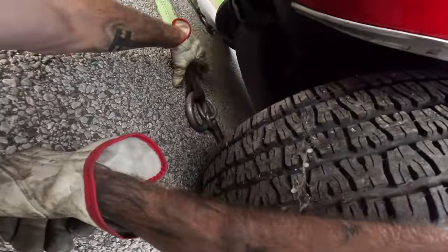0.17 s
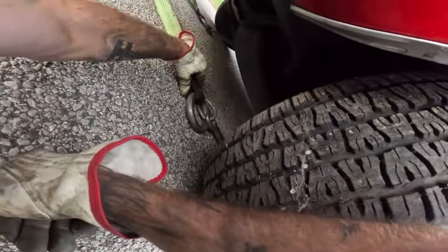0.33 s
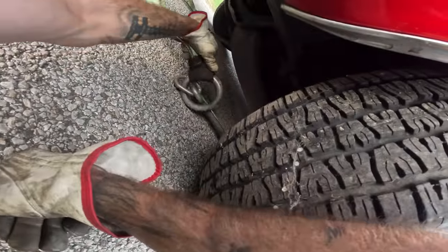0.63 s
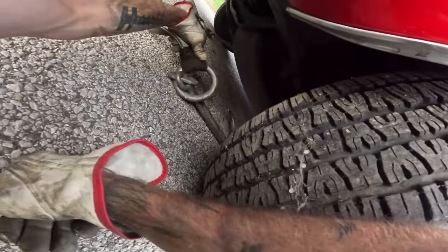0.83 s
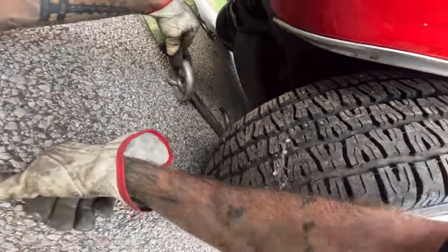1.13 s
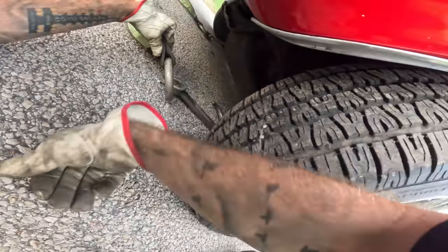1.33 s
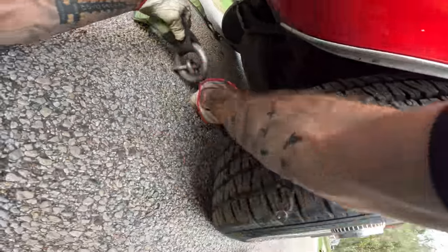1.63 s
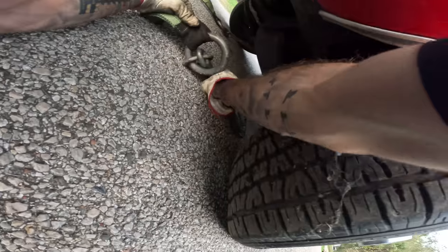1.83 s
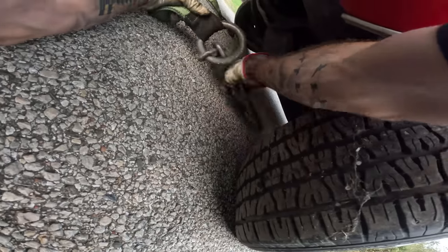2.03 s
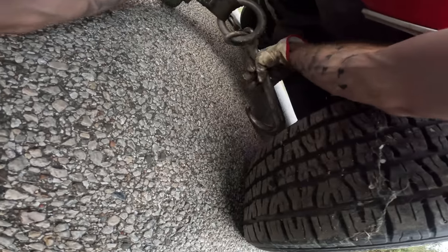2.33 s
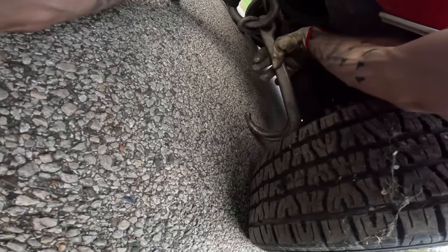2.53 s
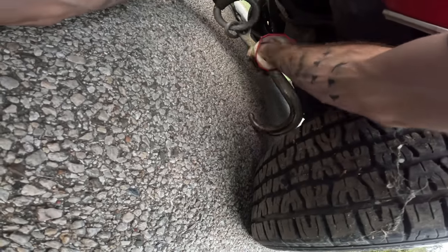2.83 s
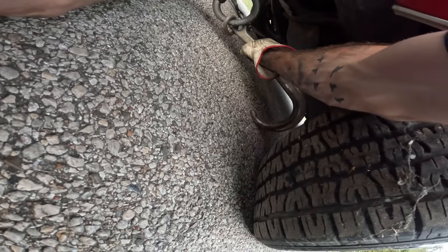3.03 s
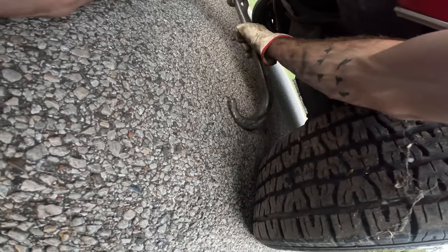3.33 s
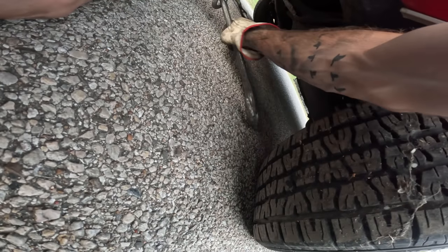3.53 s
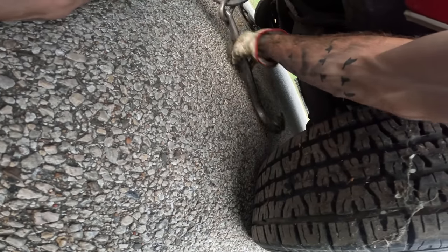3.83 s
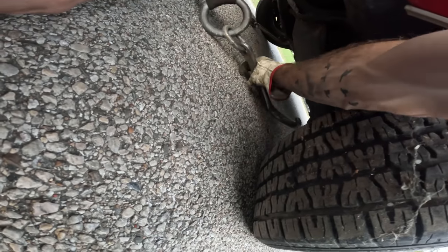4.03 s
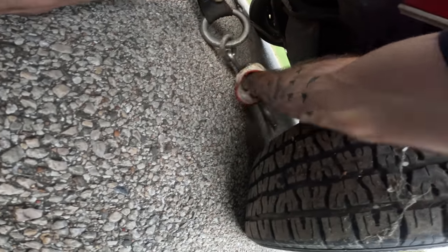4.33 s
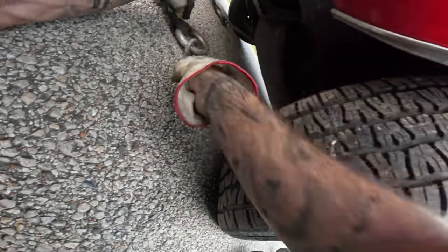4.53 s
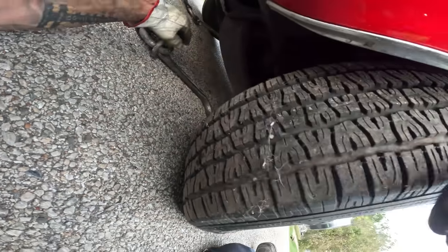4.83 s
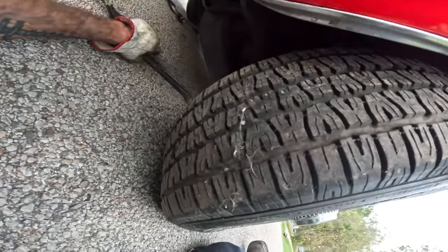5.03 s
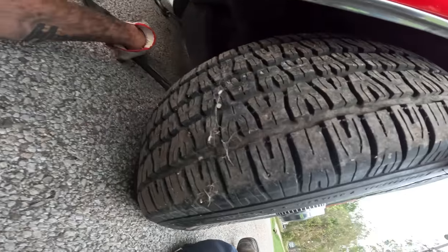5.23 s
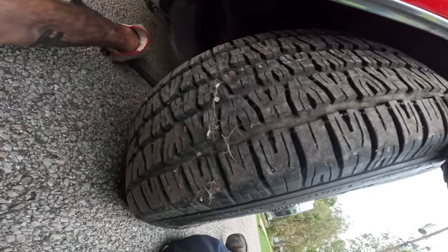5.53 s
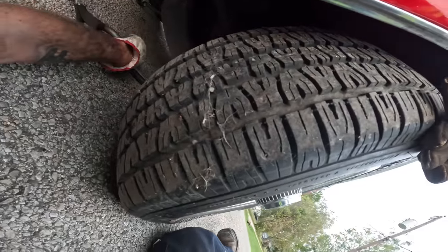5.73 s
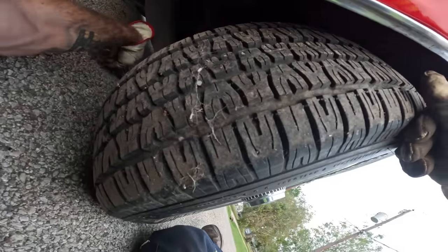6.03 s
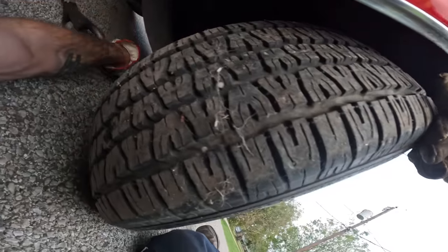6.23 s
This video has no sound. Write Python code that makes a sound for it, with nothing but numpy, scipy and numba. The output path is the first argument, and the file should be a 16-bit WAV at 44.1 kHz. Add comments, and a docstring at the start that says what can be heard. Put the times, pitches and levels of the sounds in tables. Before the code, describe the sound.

A steel tow chain and hook clink, rattle and scrape over gritty asphalt under a car, while a truck engine idles nearby.

```python
"""On gravelly asphalt beside a car, one close microphone; a truck engine idles nearby throughout.
From 0.3 s a steel tow chain is dragged in: blows and scraping ring its links, ring and hook, grit
crunches, and a hand or the ground chokes the ringing. Around 3 s the hook bears firmly on the car's
underside and knocks thump the chassis. The chain rattles on, goes quiet near 5 s and ends in a
last clatter just after 6 s."""
import sys
import numpy as np
from scipy import signal
from scipy.fft import rfft, irfft
from scipy.io import wavfile
from scipy.ndimage import uniform_filter1d, minimum_filter1d
from numba import njit

SR = 44100
rng = np.random.default_rng(int(sys.argv[2]) if len(sys.argv) > 2 else 0)


def pcm_store(signal):
    """Save signal as 16-bit PCM."""
    levels = np.round(np.clip(np.atleast_2d(signal), -1, 1) * 32767)
    wavfile.write(sys.argv[1], SR, levels.astype(np.int16).T)


N = 281358

# the idle's firing rate, and the level of the whole background, which dips while the chain is loud:
# time_s, firing_hz, background_db
BACKGROUND = [(0, 28.9, -34.5), (.1, 28.25, -35.5), (.43, 28.83, -35.5), (.91, 28.84, -37),
              (1.1, 28.69, -42.5), (1.87, 28.5, -39.5), (2.45, 28.93, -37), (3.13, 28.33, -40),
              (3.73, 28.45, -37.5), (4.42, 28.48, -38.5), (4.78, 28.77, -41), (4.9, 29.1, -40),
              (5.2, 28.8, -39), (5.67, 28.91, -36), (6.15, 28.74, -34), (6.38, 29.1, -33.5)]
# exhaust harmonics: firing_multiple, level_db
EXHAUST_ORDERS = [(1, -21), (2, 2), (3, -7.5), (4, 1), (5, -5), (6, -18.5), (7, -6.5), (8, -5.5), (9, -7),
                  (10, -42), (11, -18), (12, -28.5), (13, -14.5), (14, -22), (15, -25.5), (16, -53),
                  (17, -39.5), (18, -16), (19, -26.5), (20, -33.5), (21, -36), (22, -32)]
# street and engine noise: frequency_hz, density_db
STREET_SPECTRUM = [(15, -36), (25, 7), (54, -2.5), (219, 1), (301, -15), (373, -16.5), (450, -7.5),
                   (543, -7.5), (1060, -22.5), (2020, -24), (3540, -28), (12400, -53), (15000, -91.5)]

# steel striking steel: start_s, links_db, then relative to the links hook_db, ring_db, overtones_db,
# shackle_db, then the pitches driven hardest, link_hz, hook_hz
CLINKS = [(0.271, -32, 2.5, -27, -37, -35, 3710, 2140), (0.29, -24.5, -10, -20, -35, -32, 3950, 2080),
          (0.3137, -35, -18, -25, -18, -32, 3700, 2580), (.442, -15.5, -4, -17, -13, -34, 4120, 2580),
          (0.4581, -6.5, -26, -36, -16, -40, 3840, 2390), (.519, -21, -8, -29, -21, -28, 4150, 2350),
          (0.5337, -17, -12, -19, -7, -16, 4030, 2300), (0.5536, -24, -3, -12, -18, -29, 4270, 2420),
          (0.5782, -4.5, -21, -27, -16, -26, 3790, 2400), (0.609, -12.5, -2, -32, -30, -35, 4280, 1370),
          (0.625, -7, -7, -20, -24, -17, 3850, 2390), (0.645, -2.5, -12, -11.5, -16, -14.5, 4680, 2390),
          (.7763, -17, -2, -23, -26, -34, 3840, 2470), (0.7969, -15, -12, -17, -25, -27, 4490, 1470),
          (.823, -3.5, -32, -10, -16, -15, 3855, 2440), (0.8693, 0, -8, -14, -6.5, -14, 3827, 2800),
          (1.0156, -8, -5, -6, -15, -43, 3830, 2800), (1.218, -9.5, -14.5, -10, -15, -23, 3920, 2770),
          (1.2434, -12, -6.5, -10, -24, -23, 3840, 2800), (1.3087, -15.5, -11.5, -30, -11, -35, 3840, 2790),
          (1.513, -15, -14, -7, -7, -29, 3840, 2380), (1.5523, -33, 1, -12, -14, -22, 3900, 2580),
          (1.5892, -10.5, -13, -18, -22, -31, 3880, 2220), (1.6342, -18, -13, -6, -24, -31, 3730, 2830),
          (1.6412, -4.5, -11, -29, -22, -11, 4370, 2800), (1.72, -22, -6, -31, -37, -30, 3840, 2360),
          (1.7458, -12.5, -21, -32, -27, -40, 4560, 2820), (1.7778, -3.5, -22, -23, -30, -33, 3840, 2920),
          (1.8616, -15.5, -15, -29, -37, -41, 4560, 2800), (1.959, -30, -18, -15, -24, -33, 4140, 2420),
          (1.975, -18, -11, -18, -28, -33, 3760, 1370), (2.0072, -27, 1, -34, -31, -39, 3830, 2500),
          (2.0647, -28.5, 8, -28, -14, -33, 4530, 2200), (2.1177, -24, 2, -9, -26, -21, 4500, 2380),
          (2.138, 0, -30, -16, -27, -23.5, 3760, 2560), (2.1968, -8, -6, -14.5, -17, -18, 3620, 2500),
          (2.2297, -8, -8, -13, -10, -27, 4300, 2470), (2.25, -12.5, -6, -31, -33, -35, 4560, 2500),
          (2.3873, -13.5, -1, -16, -17, -31, 4050, 1470), (2.4218, 0.5, -16, -21, -14, -21.5, 3770, 2760),
          (2.4707, 0, -9, -24, -15, -28, 4000, 2080), (2.5142, -2, -24, -12, -3, -16.5, 3860, 1890),
          (2.5581, 1.5, -13, -24, -21, -21, 3880, 2070), (2.675, -10, 5, -40, -40, -44, 3700, 2366),
          (2.965, -35, -6, -24, -31, -42, 4035, 2230), (2.9801, -25, 2.5, -26, -32, -41, 3870, 2610),
          (3.0725, -18, 9.5, -15, -27, -35, 3706, 1340), (3.1381, -3, -13, -14.5, -3.5, -14, 4056, 2210),
          (3.2568, -3.4, -12, -16, -13, -29, 3840, 2440), (3.3002, -20, -2, -22, -20, -33, 3920, 1510),
          (3.32, -14.5, -17, -23, -3, -33, 3850, 2760), (3.3267, -7.5, -27, -14, -12, -31, 4150, 2350),
          (3.4325, -32, 8, -22, -43, -37, 4220, 2920), (3.5722, -21.5, 3, -13, -15, -27, 3790, 2440),
          (3.6241, -20, 4, -16, -21, -30, 3900, 2420), (3.6379, -4.5, -6.5, -8.5, -9.5, -25, 3700, 2440),
          (3.7773, -30, -3, -12, -19, -21, 4550, 2400), (3.7949, 1, -11.5, -16.5, -10, -22, 3700, 2290),
          (3.854, -16, -12, -10, 1.5, -31, 4147, 2430), (3.9506, -5.5, -32, -27, -8, -25, 3880, 2400),
          (4.003, -27.5, -4, -5, -28, -28, 4750, 2400), (4.056, -27, -2, -27, -25, -20.5, 4280, 1370),
          (4.0947, -9, -12, -24, -36, -37, 4560, 2440), (4.147, -12, -1.5, -22, -25, -20, 4450, 2490),
          (4.1853, -10, -20, -16, -14, -32, 4340, 2480), (4.228, -22, -7, -27, -21, -28, 4000, 2410),
          (4.2425, -14, 3, -30, -6, -22, 3825, 2490), (4.3886, -33, -8, -28, -17, -17, 3580, 2080),
          (4.4583, -0.5, -19.5, -15, -13.5, -25, 3835, 1510), (4.6137, -15, -28, -26, -25, -21, 4080, 2430),
          (4.7563, -29, -20, -30, -19, -28, 4100, 2435), (4.774, -7.5, -15.5, -29, -17, -26, 3830, 2360),
          (4.9986, -38, 4, -21, -4, -8, 3780, 2340), (5.089, -26.5, -16, -22, -30, -38, 3800, 1420),
          (5.118, -18.5, -10, -27, -36, -40, 3820, 2740), (5.448, -6, -29, -26, -18, -26.5, 3900, 2442),
          (5.4983, -15, -3, -27, -27, -29, 4630, 2820), (5.5278, -9, -11, -39, -30, -28, 4200, 2800),
          (5.6032, -14.5, -8, -18, -34, -31, 3800, 2524), (5.682, -12.5, -22, -25, -34, -31, 3700, 2580),
          (5.7027, -7.5, -7, -12, -27, -30, 4000, 2580), (5.7512, -13, -10, -31, -34, -41, 3990, 2440),
          (5.9165, -36, -1, -21, -31, -32, 4116, 2440), (5.9594, -14, -2.5, -22, -18, -27, 4370, 2130),
          (6.0069, -36, 5, -25, -25, -27, 4246, 2400), (6.0452, -10.5, -6, -17, -35, -24.5, 4150, 2480),
          (6.0815, -14, -5, -26, -15, -30, 4150, 2450), (6.121, -8, 5.5, -30, -8, -19, 4180, 1380),
          (6.134, -6.5, -21, -8, -3.5, -13, 4150, 2790), (6.1709, -8.5, -17, -18, -22, -24, 4120, 2700),
          (6.2883, -33.5, -2, -28, -30, -23, 3820, 2427)]
# steel rubbing steel: start_s, hold_s, links_db, then relative to the links hook_db, ring_db,
# overtones_db, shackle_db, then grip (0 free, 1 held)
SCRAPES = [(0.459, 0.013, -17, -18, -14, -28, -26, 0.46), (.55, 0.095, -32, 6, -22, -19, -23, 0.69),
           (.65, 0.033, -17, -0.5, -9, -22, -31, 0.47), (.69, 0.021, -22.5, 3, -13, -25, -21.5, 0.33),
           (0.792, 0.11, -20.5, -5.5, -9, -8.5, -15, 0.78), (.87, 0.058, -21.5, -16, -15, -1.5, -10, 0.16),
           (.94, .06, -32, -12, -9, 2.5, -7, 0.18), (1.02, 0.083, -19, -12.5, -1.5, -14, -17.5, 0.15),
           (1.13, 0.026, -14.5, -8, -5, -14, -16, 0.32), (1.221, 0.11, -35, -21, -1, -19, -14, 0.43),
           (1.53, 0.11, -34.5, -7, -8, -19, -19, 0.75), (1.638, 0.027, -12.5, -18, -7.5, -16, -27, 0.41),
           (1.73, 0.063, -27.5, -4, -6.5, -24, -20, .35), (1.865, 0.011, -38, -8, -22, -26, -24, 0.48),
           (1.9, 0.32, -51.5, 7, -14, -15, -12, 0.63), (2.139, 0.021, -13, -2.5, -21, -20, -33, 0.44),
           (2.19, 0.048, -23.5, 1, -2, -18, -12, 0.75), (2.42, 0.08, -19.5, -19, -15, -25, -25, 0.61),
           (2.515, .01, -25, -9, -28, 2, -14, 0.96), (2.56, 0.013, -20, -7, -4, -10, -20, 0.61),
           (2.676, 0.0091, -30.5, 22.5, -16.5, -32, -34, .7), (2.97, 0.011, -37, 3, -21, -27, -32, 0.67),
           (3.133, 0.016, -20, 10.5, -8.5, -5, -10, 0.59), (3.3, 0.057, -23.5, 3.5, -19, -10, -18, 0.56),
           (3.58, .05, -41, 3, -12, 0, -11, 0.28), (3.651, 0.053, -20.5, -4, -11, -2.5, -15.5, 0.15),
           (3.7, 0.034, -16.5, -12.5, -15, -13, -12, 0.27), (3.795, 0.016, -23.5, 0.5, -15, -1, -8, 0.34),
           (3.861, 0.071, -17.5, -3.5, -15.5, -7.5, -22.5, 0.58),
           (4.1, 0.039, -31.5, -14, -1, -9, -19, 0.26), (4.201, 0.083, -27, 6, -13.5, -10.5, -19, 0.71),
           (4.459, 0.04, -15, -14, -14, -19, -8.5, 0.21), (4.511, 0.031, -22, -24.5, 3, -13, -20.5, 0.18),
           (4.6, 0.02, -29.5, -10, -14.5, -20, -21, 0.32),
           (4.771, 0.025, -20, -13.5, -15.5, -14, -18, 0.18),
           (4.82, 0.035, -27.5, -18, -14, -30, -27, 0.53), (5.446, 0.013, -24.5, -13, -22, -18, -24, 0.49),
           (5.518, 0.063, -20.5, -6.5, -33, -25, -30, 0.51), (5.679, 0.041, -25.5, 0, -22, -15, -18, 0.58),
           (6.0, 0.1, -39.5, 5, -6, -20, -13, 0.58), (6.14, 0.04, -19.5, -2, -19, -9.5, -16, 0.49)]
# a hand or the ground stops the swinging chain: start_s, hold_s, added_grip
CHOKES = [(0.499, 0.02, 0.5), (0.833, 0.014, 0.1), (1.18, .025, 0.16), (1.349, .03, 0.05),
          (1.677, .03, 0.27), (1.847, .02, 0), (2.26, 0.088, .3), (2.404, .015, 0), (2.447, 0.018, 0.4),
          (2.488, .02, 0), (2.535, 0.018, 0.14), (2.608, .05, 0.1), (2.701, .1, 0.2), (3.203, .04, .3),
          (3.377, .1, 0.41), (3.731, 0.054, 0.28), (3.833, .02, 0.06), (3.958, 0.054, 0.25),
          (4.148, 0.021, 0.34), (4.305, 0.085, 0.55), (4.483, 0.01, 0.2), (4.553, 0.02, 0.2),
          (4.68, 0.053, 0.16), (4.815, .02, 0.28), (4.89, .08, 0.4), (4.99, 0.17, .3), (5.463, 0.026, 0.08),
          (5.596, 0.056, 0.14), (5.737, .09, 0.18), (6.205, 0.049, 0.33)]
# Each ringing part has a pair of tables. _HZ: pitch_hz; _MODES: relative_db, nominal_t60_s
# chain links
LINK_HZ = [3430, 3600, 3735, 3833, 3880, 3950, 4095, 4146, 4300, 4460, 4550, 4660]
LINK_MODES = [(-15, 0.054), (-15, .06), (-22.5, 0.078), (-2.5, 0.21), (-10.5, .15), (-11, 0.087),
              (-2.5, 0.17), (0, 0.12), (-9, .06), (-23.5, 0.044), (1.5, 0.086), (-11.5, 0.092)]
# long hook
HOOK_HZ = [1400, 1510, 2060, 2130, 2440, 2520, 2800]
HOOK_MODES = [(-5, 0.11), (-1, 0.16), (-1.5, 0.11), (-1.5, 0.074), (2, 0.16), (-0.5, 0.038), (-0.5, 0.21)]
# forged ring
RING_HZ = [5432, 5465, 5520, 6076]
RING_MODES = [(-6, 0.22), (-5.5, 0.07), (-11.5, 0.073), (-15.5, 0.17)]
# overtones of the links
OVERTONE_HZ = [7050, 7148, 7313, 7455, 7600]
OVERTONE_MODES = [(-2.5, 0.12), (3, 0.09), (-4.5, 0.076), (3, 0.077), (-10, 0.096)]
# shackle
SHACKLE_HZ = [6764, 7979, 8590, 8810]
SHACKLE_MODES = [(0, 0.31), (0.5, 0.06), (-9, 0.13), (-16, 0.3)]
# high steel shimmer that sounds with the shackle
TREBLE_HZ = [9710, 10590, 10850, 10950, 11700, 11860, 12140, 12300, 13010, 13150, 13420, 13700, 14280,
             15300]
TREBLE_MODES = [(3, 0.14), (-1, 0.24), (3, 0.1), (-4.5, 0.55), (5.5, 0.13), (-4, 0.26), (-1.5, .3),
                (-15.5, .3), (-2, 0.21), (-9.5, 0.25), (-30, .25), (-17, .25), (-21, .25), (-27, 0.31)]
# the car's floor pan and suspension arm
CHASSIS_HZ = [175, 235, 285, 320, 345, 362, 380, 448, 507, 750, 1040, 1310]
CHASSIS_MODES = [(-4, 0.38), (-7.5, 0.25), (-3, 0.33), (-7, 0.7), (3, 0.35), (0.5, 0.49), (-22, 0.16),
                 (-12, 0.2), (-13.5, 0.28), (-20, 0.21), (-16.5, 0.04), (-20.5, 0.06)]
# bare steel contact: frequency_hz, density_db
CRACK_SPECTRUM = [(530, -11.5), (900, -23.5), (1370, -4), (1620, -12.5), (2450, 0.5), (3320, -2.5),
                  (3780, 5.5), (5080, -6.5), (5320, -15), (7230, -12.5), (9260, -31), (12100, -42.5),
                  (15000, -111)]

# steel dragged over the stones: start_s, hold_s, grit_db, rumble_db
DRAGS = [(0.438, 0.12, -30, -30), (0.542, 0.18, -21, -24), (0.74, 0.085, -22.5, -29),
         (.86, .02, -25.5, -30), (1.006, 0.15, -30, -33), (1.227, 0.09, -36.5, -38.5),
         (1.594, 0.073, -31.5, -28.5), (1.717, 0.063, -32, -30.5), (1.862, 0.3, -36.5, -35),
         (2.132, 0.097, -32, -34), (2.385, .03, -26, -23.5), (2.47, 0.046, -39, -46),
         (2.558, 0.0073, -33, -45.5), (2.672, 0.013, -21, -12), (2.714, 0.089, -35.5, -27),
         (2.955, .04, -53.5, -30), (3.071, 0.018, -17.5, -17), (3.132, 0.077, -24, -20),
         (3.212, 0.036, -45, -24), (3.287, 0.058, -29, -24), (3.57, .05, -23, -26.5),
         (3.861, 0.099, -32, -29), (4.077, 0.21, -44, -26), (4.444, 0.012, -30, -24),
         (4.475, 0.056, -35, -40.5), (4.6, 0.048, -36, -34.5), (4.768, 0.03, -31, -32.5),
         (5.057, 0.34, -47, -39.5), (5.475, 0.66, -36, -35.5), (6.061, 0.072, -38, -32),
         (6.165, 0.015, -27, -30), (6.2, 0.11, -36, -38)]
# blows on ground and chassis: start_s, knock_db, thump_db (relative to the knock), grit_t60_s
KNOCKS = [(0.45, -18, -25, 0.08), (0.515, -24, 2, 0.34), (0.548, -20, -9, 0.19), (0.637, -8, -14, 0.055),
          (0.658, -20, -15, 0.057), (0.758, -18.5, 2, 0.15), (0.805, -10.5, -18, 0.094),
          (0.864, -7.5, -3, 0.086), (1.012, -13, -6, 0.078), (1.241, -23, -16, 0.077),
          (1.569, -23.5, -4, 0.12), (1.861, -20, 1.5, 0.061), (1.951, -19.5, -35, 0.089),
          (2.002, -18, -14, 0.051), (2.125, -20.5, -12, 0.11), (2.146, -25, -9, 0.07),
          (2.205, -18.5, -11, 0.1), (2.245, -18, -2, 0.073), (2.385, -14, -4.5, 0.088),
          (2.419, -7, -10, 0.068), (2.449, -18, -22, 0.075), (2.466, -13.5, -15, 0.064),
          (2.49, -20, -2, 0.062), (2.511, -13.5, -10, 0.041), (2.555, -10.5, -6, 0.045),
          (2.581, -23.5, 4.5, 0.086), (2.675, 2, -18, 0.083), (2.69, -14.5, 8, 0.058),
          (2.984, -31.5, 5, 0.073), (3.074, -7, -8.5, 0.098), (3.136, -28, 8, 0.08),
          (3.177, -8.5, -2, 0.079), (3.255, -12, -17, 0.21), (3.346, -28, -16, 0.15),
          (3.563, -16.5, -2, 0.062), (3.595, -8.5, -2.5, 0.099), (3.607, -19, -13, 0.068),
          (3.693, -15.5, -1, 0.17), (3.804, -40, -24, 0.1), (3.876, -11, -18, 0.029),
          (3.901, -19, 2, 0.027), (3.911, -18, -14, 0.037), (3.938, -13.5, -22, 0.078),
          (4.004, -23.5, 4, 0.073), (4.057, -15, 0, 0.045), (4.094, -11.5, -2.5, 0.19),
          (4.144, -22, 6, 0.038), (4.181, -15.5, 0, 0.049), (4.218, -13.5, -16, 0.048),
          (4.239, -12, -8.5, 0.14), (4.277, -17, -22, 0.064), (4.353, -30, 8, 0.075),
          (4.421, -26, 3.5, 0.14), (4.456, -7.5, 0, 0.064), (4.599, -26.5, 6, 0.064),
          (4.768, -18.5, -3, 0.073), (5.445, -39, -9, 0.085), (5.656, -21.5, 3.5, 0.078),
          (5.699, -17, -20, 0.086), (5.91, -19.5, -9, 0.088), (6.041, -11, -26, 0.077),
          (6.078, -13.5, -8, 0.076), (6.115, -4.5, -32, 0.073), (6.161, -11.5, -6.5, 0.065)]
# crunching stones: frequency_hz, density_db
GRIT_SPECTRUM = [(300, -14.5), (550, 3.5), (750, 2.5), (1000, -4.5), (1400, -5), (2200, -15), (4000, -17.5),
                 (8000, -47.5), (14000, -67.5)]
# how firmly the hook touches the chassis: time_s, touch_db
HOOK_TOUCH = [(0, -19), (1.2, -21.5), (2.3, -13), (2.62, -12), (2.66, -2.5), (3.25, -4), (3.33, -23),
              (4.4, -14), (4.6, -17.5), (6.38, -8.5)]
# dull boom of knocks and drags: frequency_hz, density_db
BOOM_SPECTRUM = [(100, -38.0), (180, 9.5), (330, 14.5), (550, 2.0), (1000, -40.5), (4000, -69.0)]
# what wanders between left and right: frequency_hz, relative_db
SIDE_SPECTRUM = [(100, -57.0), (500, -50.0), (1200, -39.5), (2500, -50), (5000, -39.5), (8000, -25),
                 (10500, -7), (13000, 0)]

SCRAPE_RISE_S, DRAG_RISE_S, CHOKE_RISE_S = 0.019, 0.0084, 0.008


def undb(db):
    """Gain of a level in dB."""
    return 10 ** (np.asarray(db) / 20)


def curves(table):
    """Each column after time_s as a value per sample."""
    times, *columns = np.transpose(table)
    return [np.interp(np.arange(N) / SR, times, column) for column in columns]


def colour(x, spectrum):
    """Causal filter of unit energy with the spectrum's shape, built from the cepstrum."""
    hz, db = np.transpose(spectrum)
    size = 2048
    grid_hz = np.maximum(np.arange(size // 2 + 1), 1) * SR / size
    cepstrum = irfft(np.interp(np.log(grid_hz), np.log(hz), db) * np.log(10) / 20)
    cepstrum[1:size // 2] *= 2
    cepstrum[size // 2 + 1:] = 0
    response = irfft(np.exp(rfft(cepstrum)))
    return signal.fftconvolve(x, response / np.sqrt(np.sum(response ** 2)))[:N]


def wander(rate_hz, count=1):
    """Rows of random values, a new one every 1 / rate_hz s, with glides between; spread near 1."""
    hold = int(SR / rate_hz)
    held = np.repeat(rng.standard_normal((count, N // hold + 1)), hold, axis=1)
    return uniform_filter1d(held, hold, axis=1)[:, :N]


def clicks(per_s, spread_db):
    """Dense irregular contacts of uneven size, rms 1."""
    size = undb(spread_db * np.minimum(rng.exponential(size=N), 4)) * rng.standard_normal(N)
    contacts = size * (rng.random(N) < per_s / SR)
    return contacts / np.sqrt(np.mean(contacts ** 2))


def bursts(start_s, db, t60_s):
    """Noise bursts with a sudden start and an exponential tail."""
    envelope = np.zeros(N)
    for at_s, gain, tail_s in np.broadcast(start_s, undb(db), t60_s):
        first = int(at_s * SR)
        age = np.arange(min(int(tail_s * SR) + 1, N - first))
        envelope[first + age] += gain * 1000. ** (-age / (tail_s * SR))
    return envelope * rng.standard_normal(N)


def strokes(start_s, hold_s, db, rise_s, fade_db_s):
    """Summed level in dB of strokes that climb 40 dB per rise_s, hold and fade."""
    grid = np.arange(0, N, 64)
    since_s = grid / SR - start_s[:, None]
    rise_db = -40 * np.maximum(-since_s / rise_s, 0)
    fade_db = -fade_db_s * np.maximum(since_s - hold_s[:, None], 0)
    power = np.sum(undb(db[:, None] + rise_db + fade_db) ** 2, axis=0)
    return np.interp(np.arange(N), grid, 10 * np.log10(power + 1e-10))


@njit
def resonate(force, step, detune, decay, damping, feed):
    """One decaying mode per row of force; a contact of finite length feeds it gradually."""
    out = np.zeros(force.shape[1])
    for m in range(len(step)):
        push, swing = 0j, 0j
        for i in range(len(out)):
            if i % 64 == 0:
                turn = np.exp(1j * step[m] * (1 + detune[m, i]))
            push = push * turn * (1 - feed) + feed * force[m, i]
            swing = swing * turn * (1 - decay[m] * damping[i]) + push
            out[i] += swing.imag
    return out


def ring_part(hz, modes, blows, rub_db, damping, spread, contact_s):
    """Blows (start_s, level_db, chatter_s) and rubbing ring a part; each contact favours other modes."""
    start_s, blow_db, chatter_s = blows
    mode_db, t60_s = np.transpose(modes)
    share = undb(mode_db) / np.sqrt(np.sum(undb(mode_db) ** 2))
    decay = np.log(1000) / (np.clip(t60_s, .01, 3) * SR)
    rubbing = clicks(2500, 3.2) * undb(rub_db + 3 * wander(25, len(hz)))
    # steady rubbing builds up over the ring time, so long modes need less force
    force = rubbing * np.sqrt(4 * decay)[:, None]
    # each blow chatters: five weakening rebounds follow at uneven gaps
    for bounce in range(6):
        scatter = rng.standard_normal((len(start_s), len(hz) + 1))
        delay_s = chatter_s / 5 * bounce * np.exp(.2 * scatter[:, -1])
        at = np.minimum(((start_s + delay_s) * SR).astype(int), N - 1)
        bounce_db = blow_db.reshape(len(start_s), -1) - 2.48 * bounce + 4.5 * scatter[:, :-1]
        force[:, at] += undb(bounce_db).T
    # neighbouring parts differ a little in size, so the pitch shifts from contact to contact
    detune = spread * wander(30, len(hz))
    step = 2 * np.pi * np.array(hz) / SR
    feed = min(1 / (contact_s * SR), 1.)
    return resonate(force * share[:, None] + 1e-18, step, detune, decay, damping, feed)


def truck_and_street():
    """Nearby: wavering exhaust harmonics over street and engine noise, all on one background level."""
    firing_hz, background_db = curves(BACKGROUND)
    order, order_db = np.transpose(EXHAUST_ORDERS)[:, :, None]
    firings = np.cumsum(firing_hz) / SR
    phase = 2 * np.pi * (firings * order + rng.random(order.shape))
    waver_db = 0.7 * wander(9, len(order))
    wobble = 0.1 * order * wander(6, len(order))
    hum = np.sum(undb(order_db + waver_db) * np.sin(phase + wobble), axis=0)
    # the mechanical noise swells once per firing
    throb = 1 + 0.29 * np.cos(2 * np.pi * firings)
    noise = throb * undb(1.8 * wander(4.5)[0]) * colour(rng.standard_normal(N), STREET_SPECTRUM)
    noise_db = -39 + 0.96 * (background_db - np.mean(background_db))
    return undb(background_db + 1) * hum + undb(noise_db) * noise


def contact_lift(hz, loudest_hz, range_db, width):
    """Lift in dB per blow and mode: the contact point drives the modes near one pitch hardest."""
    distance = np.log(np.array(hz) / loudest_hz[:, None]) / width
    return range_db * (np.exp(-distance ** 2) - .5)


def crack_and_rasp(start_s, blow_db, scrape_db, grip):
    """The contact itself: a crack per blow, and a rasp that grows with the grip while steel rubs."""
    # the lighter a blow, the more of it is bare crack
    crack = bursts(start_s, -16 + 0.93 * blow_db, t60_s=.04)
    rasp = undb(scrape_db - 14 + 7.5 * (grip - 0.4)) * clicks(1800, 2.8)
    return colour(crack + rasp, CRACK_SPECTRUM)


def grip_damping(grip):
    """Factor on the decay rate: a glove or the ground chokes the ringing steel."""
    t = np.arange(N) / SR
    choke = sum(added * ((t > start_s) & (t < start_s + hold_s)) for start_s, hold_s, added in CHOKES)
    total_grip = grip + uniform_filter1d(choke, int(CHOKE_RISE_S * SR))
    return 43.0 ** (np.clip(total_grip, 0, 1.3) - .33)


def tow_chain():
    """Close to the microphone: links, hook, ring and shackle sing when struck or rubbed."""
    start_s, blow_db, hook_db, ring_db, overtone_db, shackle_db, link_hz, hook_hz = np.transpose(CLINKS)
    rub_s, hold_s, links_db, *relative_db, scrape_grip = np.transpose(SCRAPES)
    link_rub_db, hook_rub_db, ring_rub_db, overtone_rub_db, shackle_rub_db, treble_rub_db = [
        strokes(rub_s, hold_s, links_db + db, SCRAPE_RISE_S, fade_db_s=425)
        for db in [0, *relative_db, relative_db[-1] - 6]]  # the treble modes follow the shackle
    grip = np.interp(np.arange(N) / SR, rub_s + hold_s / 2, scrape_grip)
    damping = grip_damping(grip)

    def part(hz, modes, hit_db, rub_db, spread, contact_s=.001, grip_share=1):
        """One set of modes, chattering for about 9 ms a blow and damped by its share of the grip."""
        blows = (start_s, hit_db, .009)
        return ring_part(hz, modes, blows, rub_db, damping ** grip_share, spread, contact_s)

    link_lift_db = contact_lift(LINK_HZ, link_hz, range_db=11, width=.016)
    hook_lift_db = contact_lift(HOOK_HZ, hook_hz, range_db=12, width=.052)
    # rubbing keeps the contact point of the latest blow
    latest = np.maximum(np.searchsorted(start_s * SR, np.arange(N)) - 1, 0)
    steel = part(LINK_HZ, LINK_MODES, blow_db[:, None] - 12.5 + link_lift_db,
                 link_rub_db - 5 + .5 * link_lift_db[latest].T, spread=.0018, contact_s=.0019)
    steel += part(HOOK_HZ, HOOK_MODES, (blow_db + hook_db)[:, None] - 9.5 + hook_lift_db,
                  hook_rub_db - 7.5 + .48 * hook_lift_db[latest].T, spread=.0022, contact_s=.0011)
    steel += part(RING_HZ, RING_MODES, blow_db + ring_db - 10, ring_rub_db - 6,
                  spread=.0008, grip_share=.35)
    steel += part(OVERTONE_HZ, OVERTONE_MODES, blow_db + overtone_db - 9, overtone_rub_db - 4,
                  spread=.002, grip_share=.95)
    steel += part(SHACKLE_HZ, SHACKLE_MODES, blow_db + shackle_db - 9, shackle_rub_db - 4,
                  spread=.0005, grip_share=.7)
    steel += part(TREBLE_HZ, TREBLE_MODES, blow_db + shackle_db - 18, treble_rub_db - 7,
                  spread=.0006, contact_s=.0025, grip_share=.8)
    return steel + crack_and_rasp(start_s, blow_db, link_rub_db, grip)


def gravel():
    """On the asphalt: heavy steel taps and loosens stones; grit crunches under the dragged hook."""
    start_s, knock_db, _, t60_s = np.transpose(KNOCKS)
    drag_s, hold_s, grit_db, _ = np.transpose(DRAGS)
    taps = bursts(start_s, knock_db - 7, t60_s=.012)
    loose_stones = bursts(start_s, knock_db - 14, t60_s)
    crunch_db = strokes(drag_s, hold_s, grit_db, DRAG_RISE_S, fade_db_s=254)
    crunch = undb(crunch_db - 9.5) * clicks(900, 2.35)
    return colour(taps + loose_stones + crunch, GRIT_SPECTRUM)


def chassis():
    """Under the car: knocks thump, drags rumble; a firmer hook rings the chassis louder and longer."""
    start_s, knock_db, thump_db, t60_s = np.transpose(KNOCKS)
    drag_s, hold_s, _, rumble_db = np.transpose(DRAGS)
    touch_db, = curves(HOOK_TOUCH)
    drag_db = strokes(drag_s, hold_s, rumble_db, DRAG_RISE_S, fade_db_s=120)
    hit_db = knock_db + thump_db
    blows = (start_s, hit_db + touch_db[(start_s * SR).astype(int)] - 11.5, 0.13 * t60_s)
    thump = ring_part(CHASSIS_HZ, CHASSIS_MODES, blows, drag_db + touch_db - 1.5,
                      damping=undb(-.4 * touch_db), spread=.0037, contact_s=.0014)
    boom = bursts(start_s, hit_db - 9.5, 1.58 * t60_s)
    rumble = undb(drag_db - 8) * clicks(800, 3.9)
    return thump + colour(boom + rumble, BOOM_SPECTRUM)


def scene():
    """One spot in front of the microphone; only the top treble wanders between the sides."""
    mid = tow_chain() + gravel() + chassis() + truck_and_street()
    delayed = np.roll(mid, int(.0011 * SR))
    side = undb(-5) * wander(15)[0] * colour(delayed, SIDE_SPECTRUM)
    return mid + np.array([side, -side])


def record(dry):
    """Behind the microphone, a fast limiter holds the loudest blows down and the top is cut."""
    ceiling, top_hz, hold = .55, 15600, int(0.002 * SR)
    allowed_gain = np.minimum(1, ceiling / (np.max(np.abs(dry), axis=0) + 1e-9))
    gain = uniform_filter1d(minimum_filter1d(allowed_gain, 2 * hold), hold)
    lowpass = signal.ellip(10, .2, 80, top_hz, fs=SR, output="sos")
    return signal.sosfilt(lowpass, gain * dry)


dry = scene()
out = record(dry)
pcm_store(out)
```